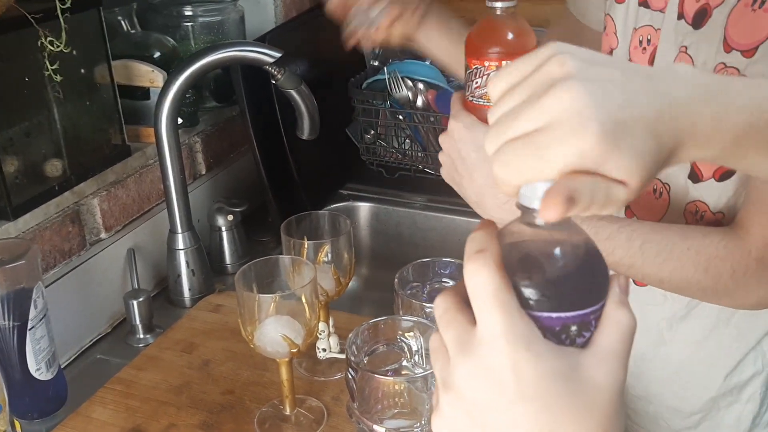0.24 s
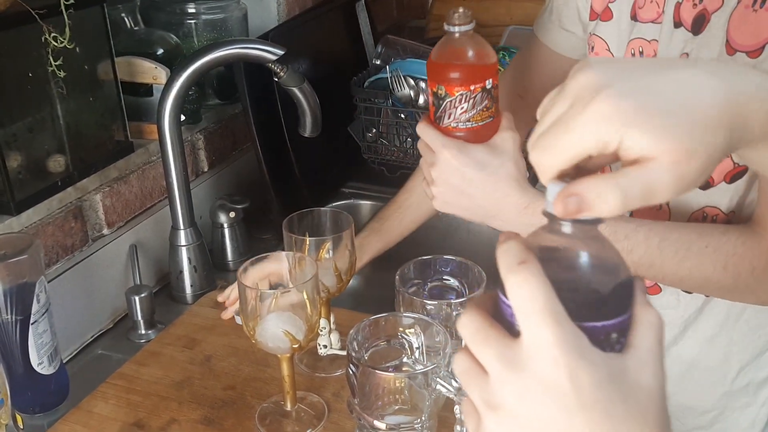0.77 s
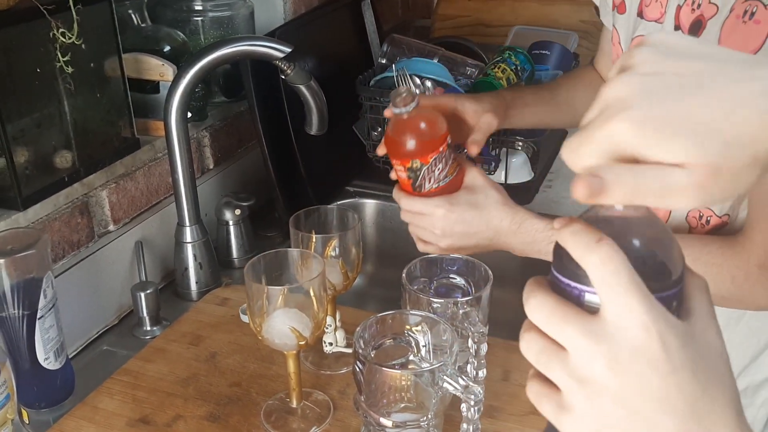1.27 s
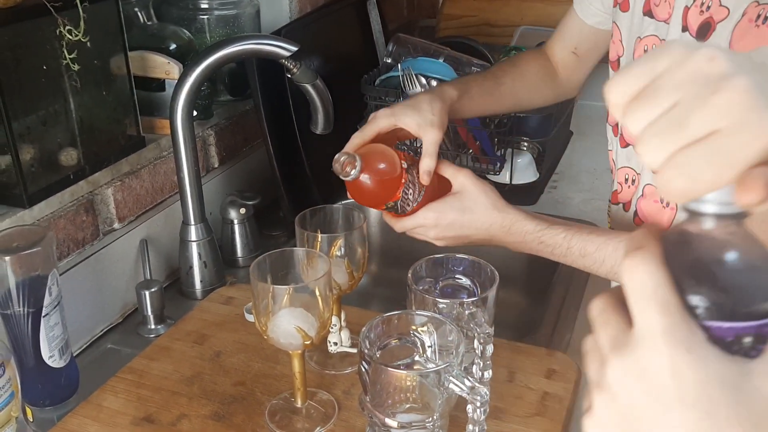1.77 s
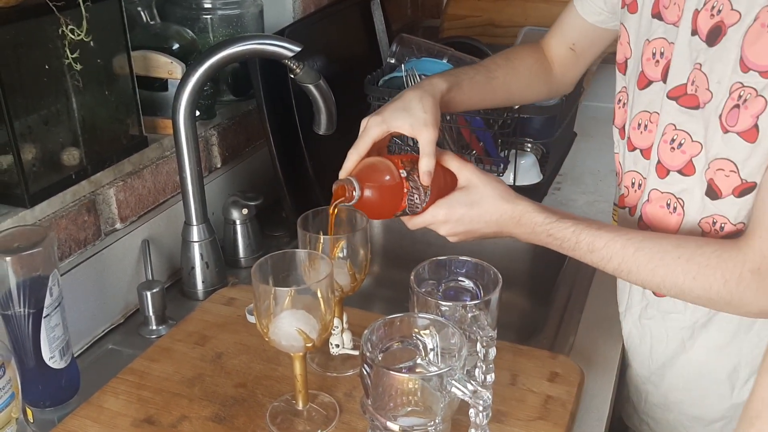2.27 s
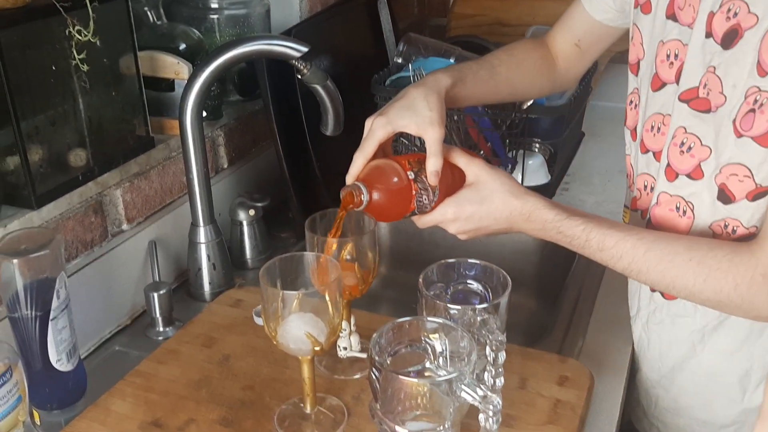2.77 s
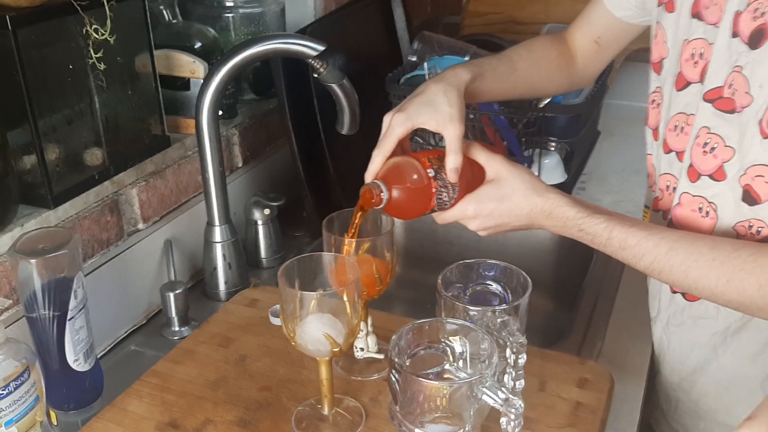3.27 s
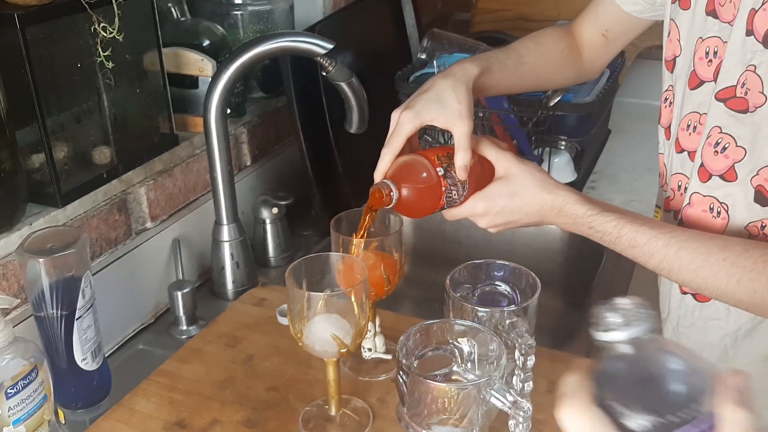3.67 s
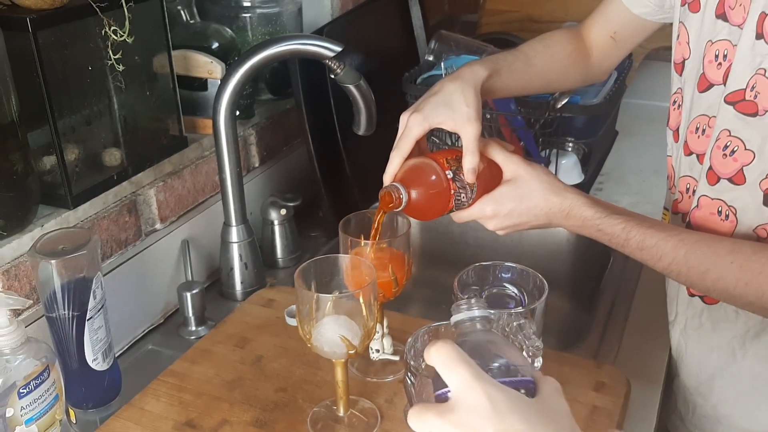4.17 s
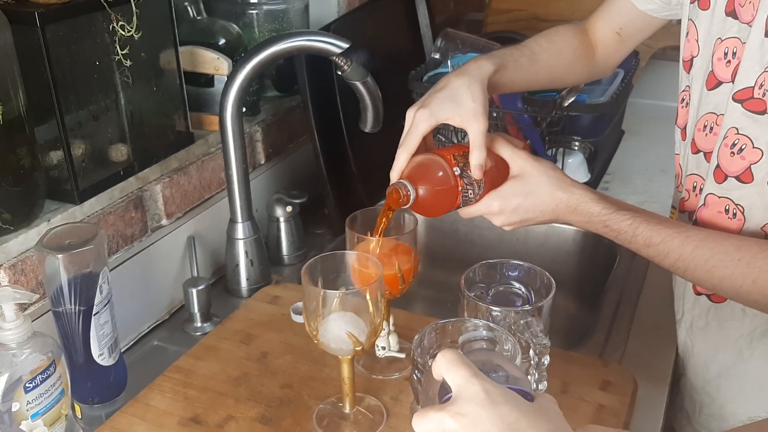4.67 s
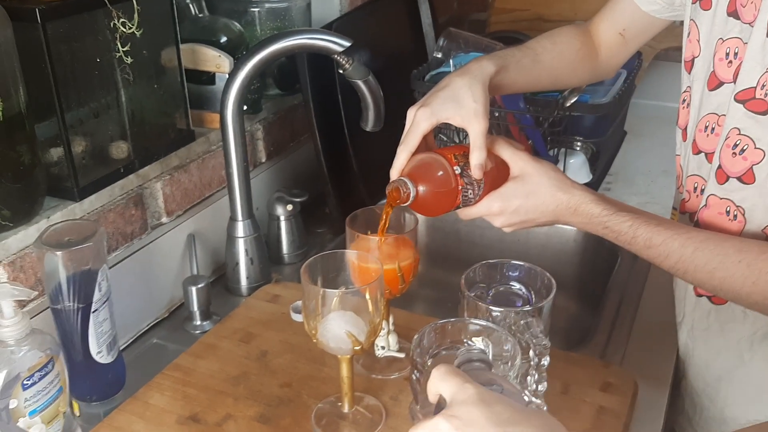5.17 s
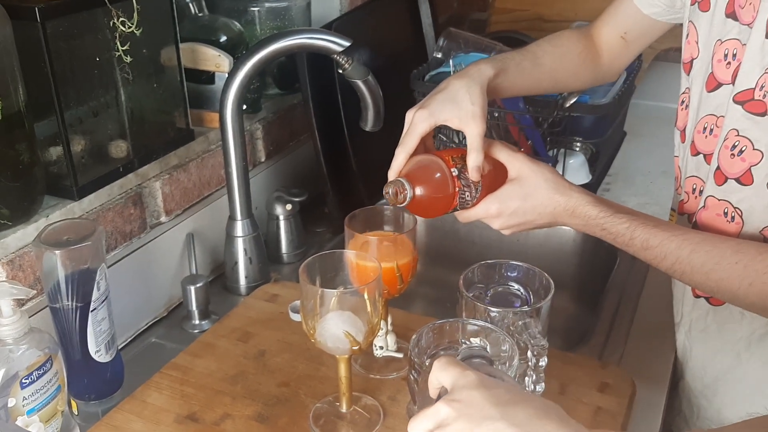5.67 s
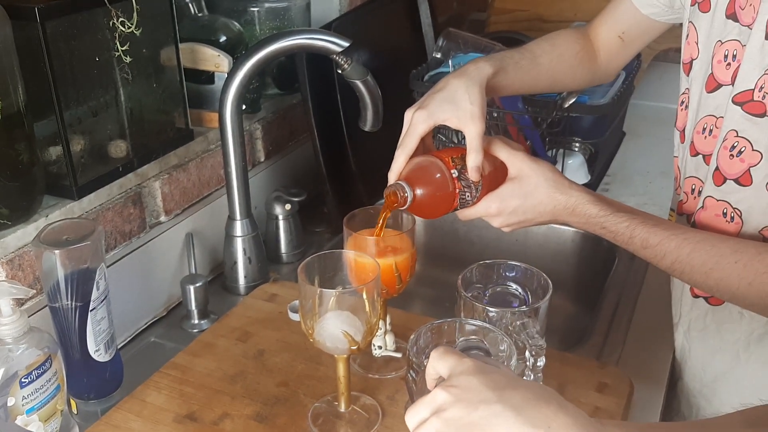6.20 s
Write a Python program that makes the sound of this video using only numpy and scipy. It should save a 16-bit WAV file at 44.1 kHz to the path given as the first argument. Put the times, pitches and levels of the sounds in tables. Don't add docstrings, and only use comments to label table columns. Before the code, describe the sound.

A plastic bottle cap is twisted open with a short whistling hiss and sharp seal snaps, then fizzy drink pours over clinking ice.

```python
import sys
import numpy as np
from scipy import signal
from scipy.fft import rfft, irfft, next_fast_len
from scipy.io import wavfile
from scipy.ndimage import uniform_filter1d

SR = 44100
rng = np.random.default_rng(int(sys.argv[2]) if len(sys.argv) > 2 else 0)


def master_out(mix):
    frames = np.transpose(np.atleast_2d(mix))
    ceiling = np.clip(frames, -1, 1)
    pcm = np.round(ceiling * 32767).astype(np.int16)
    wavfile.write(sys.argv[1], SR, pcm)


def gain_from_db(level_db):
    decades = np.asarray(level_db, float) / 20
    return 10 ** decades


N = 284004

# frequency in Hz, level in dB per Hz
AIR = [(25, -50), (40, -58), (55, -27), (85, -10.5), (120, -8), (160, -8.5), (200, -15), (250, 2),
       (320, -10.5), (450, -10.5), (650, -14), (900, -23), (1500, -24.5), (2300, -47.5)]
# frequency in Hz, correlation from -1 to 1
AIR_LIKENESS = [(60, .93), (180, .9), (550, .6), (1650, -.1), (4970, 0), (15000, 0)]
# frequency in Hz, left over right in dB
AIR_LEAN = [(60, -6.5), (180, -2), (550, -4.5), (1650, -0.5), (4970, -39), (15000, 16)]
# frequency in Hz, level in dB
HUM = [(59.2, -67.5), (118.4, -65.5), (161.5, -64.5), (296.1, -65.5), (356, -67), (415, -68.5), (474, -69),
       (594, -77), (1723, -76)]
# frequency in Hz, t60 in seconds
ROOM_T60 = [(200, 0.53), (1500, 0.25), (4000, 0.18), (8000, 0.13), (16000, 0.16)]
# time in seconds, fizz in dB, bubble size (-1
FIZZING = [(0, -62.5, 0.46), (.2, -68, 0.49), (1.08, -69.5, 0.45), (1.95, -66, 0.18), (2.17, -60, 1),
           (2.33, -67.5, .2), (2.51, -64.5, 0.6), (2.75, -65, -0.093), (3.1, -70.5, 0.74),
           (3.33, -66.5, -0.054), (3.5, -68.5, 0.35), (3.74, -68.5, -0.13), (4.5, -65, -1.3),
           (5.0, -65.5, 0.16), (5.5, -66.5, 0.36), (5.84, -65.5, 0.4), (6.44, -67, 0.41)]
# frequency in Hz, level in dB per Hz
COARSE = [(1500, -1), (2100, 8.5), (3200, 2.5), (4200, 5), (5000, -34)]
# frequency in Hz, level in dB per Hz
FINE = [(3700, -34), (4500, -1), (5500, 2.5), (7200, -2.5), (7900, -14), (8200, -29)]
# frequency in Hz, level in dB per Hz
FINEST = [(8800, -31), (10200, -1.5), (12000, 1), (15700, -3), (16500, -3), (17500, -38)]
# frequency in Hz, level in dB per Hz
SPRAY = [(7600, -14), (8000, -0.5), (10000, -11), (10500, -48)]
# time in seconds, extra level in dB
SURGES = [(2.25, 5), (3.35, -6), (3.48, -5), (3.72, 8), (3.95, 8), (4.12, 13), (4.42, 7.5), (4.55, 8),
          (4.86, 13), (5.06, 3), (5.4, 6), (6.0, 9.5), (6.39, 5)]
# start in seconds, peak in dB, pitch
# in Hz, t60 in seconds
BUMPS = [(2.3, -58, 141, 0.091), (4.985, -41, 127, .13), (5.015, -42, 480, 0.061), (4.78, -47, 63, .3),
         (4.82, -52, 148, .12), (4.1, -50, 64, .2), (4.06, -52, 700, .09), (4.1, -50, 800, 0.037),
         (4.83, -42.5, 900, 0.056), (5.985, -48, 1100, .05), (4.6, -47, 267, 0.088),
         (4.805, -44, 296, 0.095), (4.989, -33, 218, 0.08), (5.02, -38.0, 220, 0.028),
         (0.701, -43.5, 827, 0.039), (2.686, -43.5, 576, 0.029), (2.711, -45, 507, 0.035),
         (4.038, -40, 720, 0.027), (4.391, -45.5, 613, 0.043), (4.601, -38.5, 690, 0.025),
         (4.825, -36, 643, 0.035), (4.993, -30.5, 590, 0.045), (5.97, -45.5, 724, 0.051),
         (2.656, -52, 650, .07), (3.905, -54, 755, .04), (4.652, -47.5, 665, .04), (5.341, -46, 540, 0.045),
         (5.435, -50, 513, .04), (5.596, -47.5, 587, 0.048), (2.199, -43.5, 1300, .025),
         (.69, -48, 260, 0.11), (.735, -47, 280, 0.097), (.79, -46, 235, .1), (.862, -43, 273, 0.14),
         (.905, -47, 250, .1), (0.7003, -33.5, 1495, 0.019)]
# start in seconds, peak in dB, pitch in Hz,
# t60 in seconds
LOW_KNOCKS = [(3.252, -54.5, 1000, .05), (3.317, -40.5, 1042, 0.047), (3.345, -51, 986, 0.067),
              (3.373, -44, 1050, .05), (3.415, -36, 1043, 0.046), (3.434, -52, 1065, 0.055),
              (3.463, -49, 1120, .06), (3.507, -52, 1000, 0.061), (3.539, -45.5, 980, .05),
              (3.559, -46.5, 950, .05), (3.612, -48.5, 1063, .06), (3.719, -51, 1110, 0.055),
              (3.899, -52, 990, .06), (3.948, -49.5, 1003, .05), (3.975, -52, 890, 0.046),
              (4.036, -43.5, 1070, 0.028), (4.089, -40, 1023, 0.034), (4.108, -47, 1126, .05),
              (4.151, -49.5, 966, 0.058), (4.225, -55, 1024, 0.041), (4.263, -58, 990, 0.068),
              (4.364, -55, 1010, 0.061), (4.392, -48.5, 1243, 0.067), (4.461, -47, 1166, .05),
              (4.599, -47.5, 830, 0.034), (5.151, -52.5, 1014, .04), (5.345, -51, 970, .05),
              (5.417, -47.5, 1000, 0.043), (5.434, -54, 1046, 0.039), (5.511, -55, 1036, .05),
              (5.718, -53, 1066, .06), (5.861, -56, 1030, .06), (5.975, -55, 1120, .06)]
# start in seconds, peak in dB, pitch in Hz, t60 in seconds
CLUNKS = [(3.253, -49.5, 1490, 0.13), (3.317, -46, 1365, 0.045), (3.386, -57, 1500, 0.087),
          (3.415, -50, 1520, 0.09), (3.464, -51, 1506, 0.22), (3.538, -55, 1490, 0.064),
          (3.556, -51, 1460, .06), (3.608, -45.5, 1895, 0.077), (3.899, -50.5, 1490, .07),
          (3.964, -48, 1487, 0.13), (4.036, -48.5, 1503, .06), (4.09, -43.5, 1510, .05),
          (4.103, -53, 1535, .06), (4.152, -48.5, 1340, .05), (4.224, -54, 1255, .04),
          (4.336, -42.5, 1525, 0.062), (4.365, -36.5, 1510, 0.058), (4.382, -45, 1370, 0.042),
          (4.4, -46, 1470, .06), (4.425, -49, 1470, 0.046), (4.467, -49, 1420, 0.069),
          (4.496, -40, 1340, 0.046), (4.519, -44.5, 1300, 0.048), (4.609, -49, 1514, 0.058),
          (4.805, -38, 1482, 0.063), (4.824, -40.5, 1565, 0.055), (4.859, -42.5, 1475, 0.042),
          (4.978, -54, 1560, .05), (4.993, -40, 1564, 0.063), (5.022, -33.5, 1480, 0.046),
          (5.04, -49, 1410, 0.049), (5.07, -60, 1480, .06), (5.151, -42, 1540, 0.039),
          (5.323, -61, 1520, .04), (5.346, -45.5, 1456, 0.071), (5.418, -53, 1550, .07),
          (5.595, -52, 1486, 0.053), (5.718, -49, 1507, 0.085), (5.861, -50, 1543, 0.074),
          (5.971, -50, 1423, 0.076), (6.018, -42.5, 1547, 0.06), (6.332, -55, 1510, .04),
          (6.346, -45.5, 1475, .05), (6.371, -40.5, 1488, .06), (6.415, -48, 1490, .06),
          (6.43, -38.5, 1540, 0.046)]
# start in seconds, peak in dB, pitch
# in Hz, t60 in seconds, left over right in dB
PINGS = [(4.09, -45, 2090, 0.045, 2), (2.1374, -30, 2410, 0.026, -3), (2.4603, -53, 3960, 0.03, -5.5),
         (2.5346, -47, 3390, 0.032, -2), (2.7043, -45, 2960, 0.026, -6.5), (3.3169, -51, 2950, 0.035, -7),
         (3.6194, -46, 2700, 0.05, -4), (4.3655, -50.5, 3035, 0.057, -3), (4.4039, -52.5, 2960, 0.058, 2),
         (4.4603, -57, 2980, 0.05, -3), (5.0195, -40, 3730, 0.02, 1), (5.3742, -46, 3060, 0.033, 1.5),
         (5.383, -49, 3170, .03, 1.5), (5.0, -41, 5350, 0.03, 1.5), (5.4979, -40.0, 5650, 0.018, 0.5),
         (2.199, -39, 2815, 0.043, -9.0), (2.2, -50, 3460, 0.066, -6.5), (3.607, -43, 5400, 0.064, -5.0),
         (3.607, -54, 4300, .07, -5), (4.4, -48, 4600, .04, 4.0), (4.8, -48, 5400, 0.033, 0.5),
         (3.541, -53, 2350, .04, -3)]
# start in seconds, peak in dB, pitch in Hz, t60 in seconds,
# left over right in dB
CAP_KNOCKS = [
    (.698, -35, 1995, 0.032, -10.5),
    (2.1978, -33.5, 2380, 0.018, -10.5),
]
# ratio to the pitch, level in dB
NOTE_MODES = [(0.99, -6.5), (1.07, -16.5), (0.84, -18)]
# resonance in Hz, width in Hz, level in dB
HOLLOW = [(1000, 280, 1.5), (1300, 130, 0), (1495, 69, 4)]
# start in seconds, peak in dB, centre in Hz, top against it in dB
ICE = [(3.062, -47, 5600, -13), (3.259, -47, 6400, -20), (3.316, -53, 2960, -3), (3.3164, -41, 6240, -13),
       (3.044, -61, 6000, 3), (3.194, -58, 5000, 0), (5.535, -47, 6300, -20), (3.3638, -52, 6130, -26),
       (3.6057, -27.5, 3960, -56), (3.707, -50.5, 5180, -7), (4.034, -48, 5800, -18),
       (4.086, -33.5, 4460, -4.5), (4.6, -40, 5600, -1.5), (4.8232, -36, 5300, -10),
       (4.8587, -39, 2560, -18), (5.02, -25.5, 6340, -5), (5.345, -44.5, 2960, -23),
       (5.4969, -45, 5460, -24), (5.558, -46.5, 3850, -12), (5.694, -46, 2520, -7),
       (5.741, -46.5, 3250, -22), (5.964, -37, 4980, -7.5), (6.2594, -62, 3180, 8)]
# start in seconds, peak in dB, centre in Hz, top against it in dB
CREAKS = [(0.527, -40.5, 6650, -2.5), (1.027, -49, 6000, -20), (1.1774, -48, 5270, -37),
          (1.31, -66, 6000, 3.5), (1.2978, -49, 5450, -27), (1.799, -59, 2540, -2),
          (2.3228, -40, 4640, -10.5), (2.5157, -45, 5270, -25), (2.498, -60.5, 6000, 4.5),
          (2.6094, -61.5, 4880, 6), (2.827, -41.5, 5200, -10), (2.8615, -48.5, 4100, -12),
          (3.172, -50, 4500, -7)]
# start in seconds, peak in dB, centre in Hz, top against it in dB, t60 in seconds
SNAPS = [(.6985, -20.5, 4230, -27, 0.044), (.7015, -21, 2910, -25, 0.055), (2.0768, -22, 5700, -12, 0.016),
         (2.1122, -19.5, 5970, -9.5, 0.03), (2.1322, -15, 5300, -13, 0.038), (2.18, -35.5, 5030, 3, 0.013),
         (2.1936, -24.5, 4940, -11, 0.067), (2.1978, -22.5, 3550, -17, 0.033),
         (2.6852, -36, 2900, -24, .014), (2.7047, -36, 2940, -23, 0.062), (2.747, -37, 4350, -12, 0.14)]
# start in seconds, hold in seconds, release in seconds, jet in dB
PUFFS = [
    (0.215, 0.08, .03, -58),
    (0.24, 0.136, .025, -58),
    (0.392, 0.11, 0.055, -65),
    (0.522, 0.04, .05, -59.5),
    (.57, .12, .05, -58),
    (0.612, 0.041, .03, -53),
    (0.648, 0.05, 0.024, -48.5),
    (0.691, 0.056, 0.034, -43.5),
    (0.745, 0.165, .1, -39.5),
    (0.926, 0.034, 0.085, -51),
]
# start in seconds, hold in seconds, release in seconds, level in dB, mode in Hz
WHISTLES = [(0.21, 0.045, .04, -65, 4600), (0.245, 0.037, 0.057, -58, 4500), (0.247, 0.093, .04, -60, 4220),
            (0.316, 0.065, .025, -57.5, 4680), (0.245, 0.13, .03, -58, 6950),
            (0.294, 0.075, .03, -60, 7600), (0.247, 0.12, .03, -63, 11700), (0.4, 0.08, .08, -61, 4540),
            (.527, 0.032, .05, -54, 6860), (0.53, .11, .05, -62, 4700), (.6, 0.048, .03, -58, 7100),
            (0.654, 0.043, .03, -48.5, 4520), (.652, 0.031, 0.027, -48.5, 6860),
            (1.176, .01, .04, -65, 4970), (1.19, .015, .04, -68, 5100), (1.1, .025, .03, -69, 4700),
            (1.03, .015, 0.034, -66, 5600), (0.77, 0.085, 0.054, -55, 4700), (0.79, 0.11, .03, -53, 5630)]
# start in seconds, hold in seconds, release in seconds, level in dB, pitch in Hz
SQUEAKS = [(.527, .035, .03, -58, 15600), (.527, .03, .03, -61, 12800), (.528, .012, .03, -66, 10100),
           (.635, .04, .04, -52, 15600), (.654, .04, .03, -46, 9950), (.654, .035, .04, -53, 12870),
           (.724, .02, .04, -48, 15600), (.724, .02, .03, -51, 12870), (.77, .14, .05, -52, 5230),
           (.78, .13, .05, -54, 6220), (.77, .13, .05, -54, 7340), (.76, .14, .05, -56, 15620),
           (.25, .07, .04, -59, 4510), (1.308, .03, .06, -72, 15500), (1.83, .09, .03, -78, 10450),
           (1.93, .1, .03, -77, 10950), (1.89, .05, .02, -72, 6900), (1.89, .05, .03, -79, 12800)]
# frequency in Hz, level in dB per Hz
JET = [(3200, -20), (3900, -5.5), (4700, 2.5), (5600, -2), (7100, -2.5), (7900, -3), (8600, -19)]
# frequency in Hz, level in dB per Hz
JET_LOW = [(700, -23), (1400, -29), (2400, -11), (3000, 2), (3800, 0.5), (4500, -11)]
# frequency in Hz, level in dB per Hz
JET_TOP = [(7500, -29), (8700, -4), (10200, -1), (12000, -7), (15700, -8), (16500, -21), (17500, -40)]
# frequency in Hz,
# gain in dB
HOUSING = [(20, 2.5), (7800, -0.5), (8200, -9.5), (9000, -10), (10000, -6.5), (11000, -1.5), (15800, 0),
           (15930, -48), (16500, -52), (16700, -70)]
# frequency in Hz, left over right in dB
PORTS = [(6000, -0.5), (8000, 7.5), (10500, 5.5), (12000, -2), (16000, -2)]


def evened(x):
    return x / np.sqrt(np.mean(x ** 2) + 1e-20)


def peaked(x):
    return x / abs(x).max()


def read(points, hz):
    f, value = np.transpose(points)
    return np.interp(np.log(hz + 1), np.log(f + 1), value)


def curves(rows):
    s, *columns = np.transpose(rows)
    return [np.interp(np.arange(N) / SR, s, c) for c in columns]


def add(mix, s, sound, pan_db):
    lag = round(-1.6 * pan_db)
    for port, (start, db) in enumerate([(lag, pan_db / 2), (0, -pan_db / 2)]):
        part = mix[port, round(s * SR) + start:][:sound.shape[-1]]
        part += gain_from_db(db) * np.atleast_2d(sound)[-port][:len(part)]


def coloured(x, *spectra):
    length = x.shape[-1]
    size = next_fast_len(length)
    z, hz = rfft(x, size), np.fft.rfftfreq(size, 1 / SR)
    return [evened(irfft(z * gain_from_db(read(s, hz)), size)[..., :length]) for s in spectra]


def resonate(x, hz, width):
    r = np.exp(-np.pi * width / SR)
    poles = [2, -4 * r * np.cos(2 * np.pi * hz / SR), 2 * r * r]
    return signal.lfilter([1 - r * r, 0, r * r - 1], poles, x)


def resonate_twice(x, hz, width):
    return resonate(resonate(x, hz, width), hz, width)


def pair(same, size=N):
    a, b = rng.standard_normal((2, size))
    return np.array([a, same * a + np.sqrt(1 - min(same, 1) ** 2) * b])


def flutter(spread_db, seconds, size=N):
    steps = rng.standard_normal(size // 32 + 1)
    steps = evened(uniform_filter1d(steps, max(round(seconds * SR / 32), 1)))
    return gain_from_db(spread_db * np.interp(np.arange(size) / 32, np.arange(len(steps)), steps))


def kitchen_air():
    frames, hz = N // 512 + 5, np.fft.rfftfreq(2048, 1 / SR)
    a, b, c, d, patches = rng.standard_normal((frames, 1025, 5)).T
    patches = evened(uniform_filter1d(uniform_filter1d(patches, 20, 0), 8, 1))
    same = np.clip(read(AIR_LIKENESS, hz), -1, 1)[:, None]
    left = a + 1j * b
    z = np.array([left, same * left + np.sqrt(1 - same ** 2) * (c + 1j * d)])
    lean = read(AIR_LEAN, hz)[:, None] / 2
    z *= gain_from_db(read(AIR, hz)[:, None] + 1.7 * patches + np.array([lean, -lean]))
    air = signal.istft(z, nperseg=2048, noverlap=1536)[1][:, :N]
    t, hum = np.arange(N) / SR, 0
    for f, db in HUM:
        strength = gain_from_db(db) * flutter(4, .025)
        waver = .045 * np.log(f / 50) * np.log(flutter(8.7, .08))
        hum = hum + strength * np.sin(2 * np.pi * (f * t + waver + rng.random()))
    return gain_from_db(-55) * evened(air) + hum


def kitchen(x):
    taps = np.zeros((2, SR // 2))
    at = np.arange(160, SR // 2 - 20, 20) + rng.integers(0, 20, (2, (SR // 2 - 161) // 20))
    np.put_along_axis(taps, at, rng.choice([-1., 1.], at.shape), 1)
    hz, t, z = signal.stft(taps, SR, nperseg=128)
    fade = gain_from_db(-60 * t / read(ROOM_T60, hz)[:, None])
    tail = signal.istft(z * fade, SR, nperseg=128)[1]
    return signal.fftconvolve(x, tail / np.linalg.norm(tail[0]), axes=1)[:, :N]


def fizz():
    t, (fine_db, size) = np.arange(N) / SR, curves(FIZZING)
    coarse_db = fine_db - 5.5 + 9.5 * size
    fresh = np.clip((t - 2.2) / 1.8, 0, 1)
    finest_db = -74 + 0.53 * (fine_db + 66.5) + 5.5 * fresh
    burst_db = 2.3 * np.minimum(rng.exponential(1, N), 4)
    pops = rng.standard_normal((2, N)) * gain_from_db(burst_db) * (rng.random(N) < 6000 / SR)
    pops = (evened(pops) + 1.43 * pair(0.024)) * flutter(0.59, 0.011)
    coarse, fine, finest, spray = coloured(pops, COARSE, FINE, FINEST, SPRAY)
    head = np.clip((t - 3.4) / 3.1, 0, .85)
    coarse = (1 - head) * coarse + head * evened(resonate(coarse, 3260, 450))
    finest = finest + gain_from_db(2.83 * (finest_db + 71) - 8.5) * spray
    bubbles = gain_from_db(coarse_db + 2.5) * coarse + gain_from_db(fine_db + 1.5) * fine + gain_from_db(finest_db + 1.15) * finest
    return gain_from_db([[-.8], [.8]]) * bubbles


def stream():
    t, surge_s = np.arange(N) / SR, 0.063
    splash_db = -68 + sum(db * np.exp(-((t - s) / surge_s) ** 2) for s, db in SURGES)
    stir = resonate(pair(0.018) * flutter(0.69, 0.027), 1476, 690)
    splash = evened(resonate(stir, 1510, 84) + 0.78 * resonate(stir, 980, 480) + 0.31 * stir)
    return gain_from_db(splash_db + 1.5) * splash


def dull_bumps(out):
    t = np.arange(5000) / SR
    for s, db, hz, t60 in BUMPS:
        rise = 1 - np.exp(-(t * hz / 1.4) ** 1.5)
        thud = np.sin(2 * np.pi * hz * t) + 3 * resonate(pair(0.92, size=len(t)), hz, 0.44 * hz)
        add(out, s, gain_from_db(db + 0.5 - 60 * t / max(t60, .01)) * rise * thud, -.3)


def blows(rows, pan_db):
    return [(*row, pan_db + 2.5 * rng.uniform(-1.2, 1)) for row in rows]


def knocks():
    out, t = np.zeros((2, N)), np.arange(5000) / SR
    for s, db, hz, t60, pan_db in [*CAP_KNOCKS, *blows(LOW_KNOCKS, 1.2), *blows(CLUNKS, 1), *PINGS]:
        rise = 1 - np.exp(-(t * hz / 2.3) ** 1.7)
        turn, grit = rng.random(len(NOTE_MODES)), pair(0.43, size=len(t))
        note = sum(gain_from_db(d) * np.sin(2 * np.pi * (k * hz * t + p)) for (k, d), p in zip(NOTE_MODES, turn))
        note = note + .17 * evened(resonate_twice(grit, hz, 540))
        note = peaked(gain_from_db(-60 * t / max(t60, .01)) * rise * note)
        if hz < 1700:
            air = 0
            for f, width, d in HOLLOW:
                near_db = d - 5.6 * abs(np.log2(f / hz))
                air = air + gain_from_db(near_db) * evened(resonate_twice(grit, f, width))
            note = note + gain_from_db(-21.5 - 60 * t / 0.19) * rise * air
        add(out, s, gain_from_db(db + 1.0) * note, pan_db)
    dull_bumps(out)
    return out


def cracks():
    out, t = np.zeros((2, N)), np.arange(5000) / SR
    top = signal.butter(4, 9500, "high", fs=SR)
    tick = gain_from_db(-60 * t / .0025)
    rows = [(*row, -4.5) for row in SNAPS]
    rows += [(*row, 0.16, -6) for row in CREAKS]
    for row in ICE:
        khz = row[2] / 1e3
        rows.append((*row, 0.046 + 0.009 * khz, -1 + 0.24 * khz))
    for s, db, hz, top_db, t60, pan_db in rows:
        t60 = max(t60, .004)
        rattle = gain_from_db(-60 * t / t60) * (1 - np.exp(-t / 0.00022))
        burst = pair(.9, size=len(t))[0] * tick * min(0.052 / t60, 2.5)
        burst = burst + 0.38 * pair(0.15, size=len(t)) * rattle
        ring = 0.81 * resonate(burst, hz, 360) + 1.2 * resonate_twice(burst, hz, 2800)
        wide = signal.butter(3, [0.41 * hz, min(1.34 * hz, 9000)], "band", fs=SR)
        body = ring + 2.2 * signal.lfilter(*wide, burst)
        body = signal.lfilter(*signal.butter(4, 0.58 * hz, "high", fs=SR), body)
        edge = signal.lfilter(*top, burst)
        add(out, s, gain_from_db(db) * (peaked(body) + gain_from_db(top_db + 7.5) * peaked(edge)), pan_db)
    return out


def opened(start, hold, release, size, rise=0.018):
    t = np.arange(size) / SR - start
    return np.clip(t / rise, 0, 1) ** 0.79 * gain_from_db(-25 * np.maximum(t - hold, 0) / release)


def blown(rows, noise, sharp, rise):
    out = np.zeros_like(noise)
    for s, hold, fall, db, hz in rows:
        a = round(s * SR)
        part = noise[:, a:a + round((hold + 3 * fall) * SR)]
        size = part.shape[1]
        tone = evened(resonate_twice(part, hz, hz / sharp))
        out[:, a:a + size] += gain_from_db(db) * opened(0, hold, fall, size, rise) * tone
    return out


def gas():
    size = 2 * SR + SR // 8
    flows = np.array([gain_from_db(db) * opened(s, hold, fall, size) for s, hold, fall, db in PUFFS])
    flow = np.sqrt((flows ** 2).sum(0) + 1e-14)
    jet_db = 20 * np.log10(flow)
    top_db = np.minimum(-6 + 0.05 * (jet_db + 38), 0)
    noise = pair(0.45, size=size) * flutter(1.2, .003, size=size)
    whistle = blown(WHISTLES, noise, sharp=15, rise=.008)
    squeal = blown(SQUEAKS, noise, sharp=75, rise=.004)
    low, body, top = coloured(noise, JET_LOW, JET, JET_TOP)
    low_db = 0.48 * (np.maximum(jet_db, -90) + 38.5) - 7
    jet = flow * (body + gain_from_db(low_db) * low + gain_from_db(top_db) * top) + whistle + squeal
    jet[0] = np.roll(jet[0], 1)
    return np.pad(jet * gain_from_db([[-1.2], [1.2]]), ((0, 0), (0, N - size)))


def scene():
    crack, knock, hiss = cracks(), knocks(), gas()
    wet = gain_from_db(-5.0) * crack + gain_from_db(-6) * knock + gain_from_db(-5.5) * hiss
    return crack + knock + hiss + kitchen(wet) + fizz() + stream() + kitchen_air()


def low_pass(x):
    return signal.sosfilt(signal.butter(12, 16550, fs=SR, output="sos"), x)


def record(dry):
    hz = np.linspace(0, SR / 2, 1025)
    housing = []
    for side in (.5, -.5):
        gain = gain_from_db(read(HOUSING, hz) + side * read(PORTS, hz))
        housing.append(signal.firwin2(601, hz, gain, fs=SR))
    rumble_filter = signal.butter(2, 36, "high", fs=SR, output="sos")
    heard = signal.sosfilt(rumble_filter, dry)
    mix = signal.oaconvolve(heard, np.array(housing), "same", axes=1)
    return low_pass(mix)


dry = scene()
out = record(dry)
master_out(out)
```